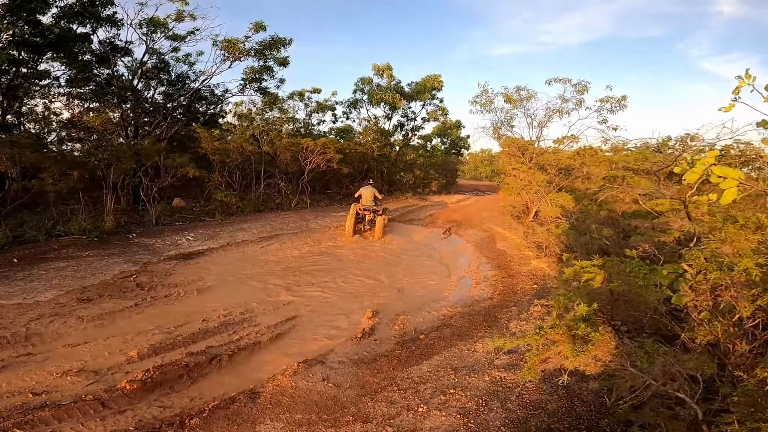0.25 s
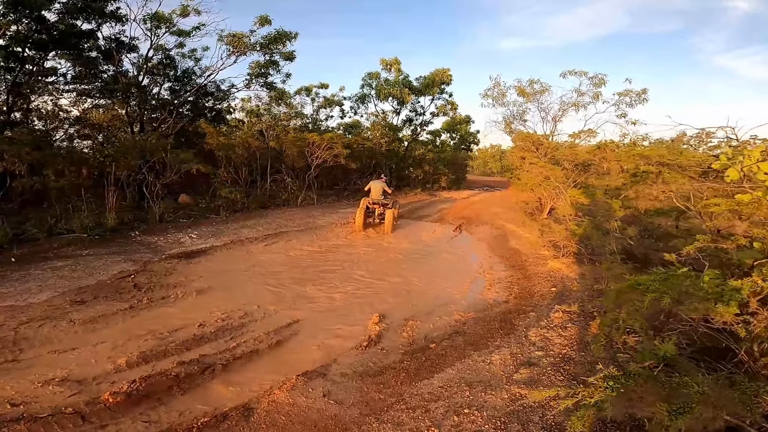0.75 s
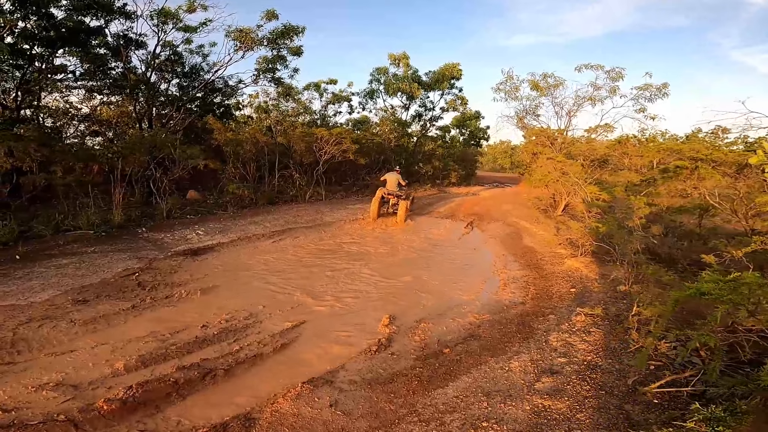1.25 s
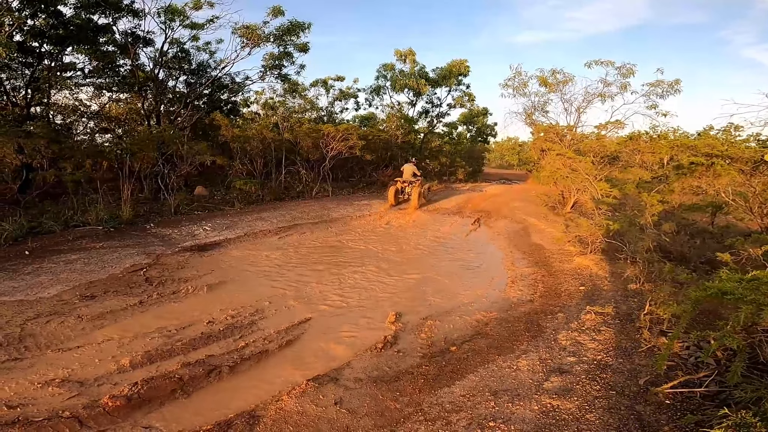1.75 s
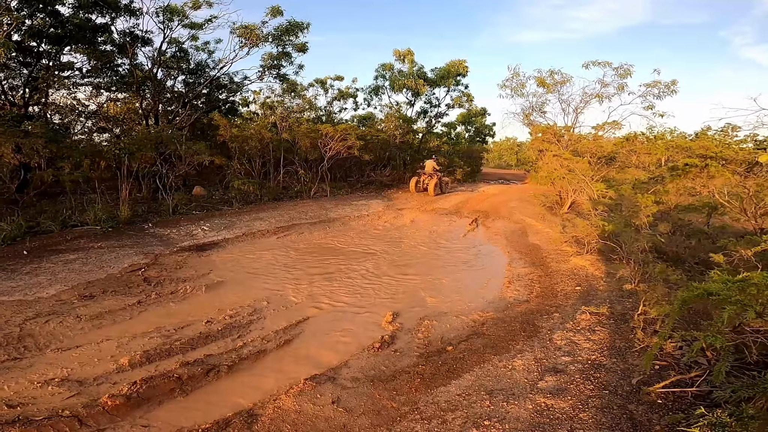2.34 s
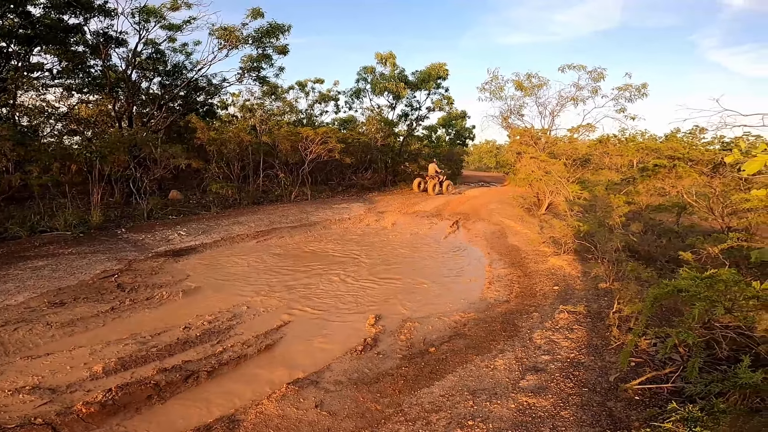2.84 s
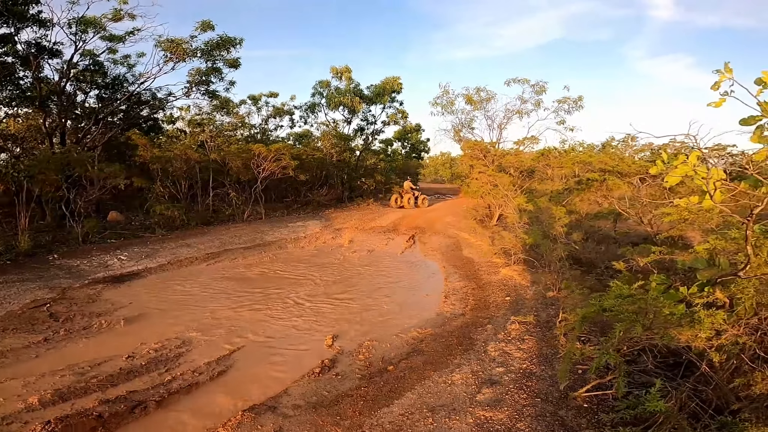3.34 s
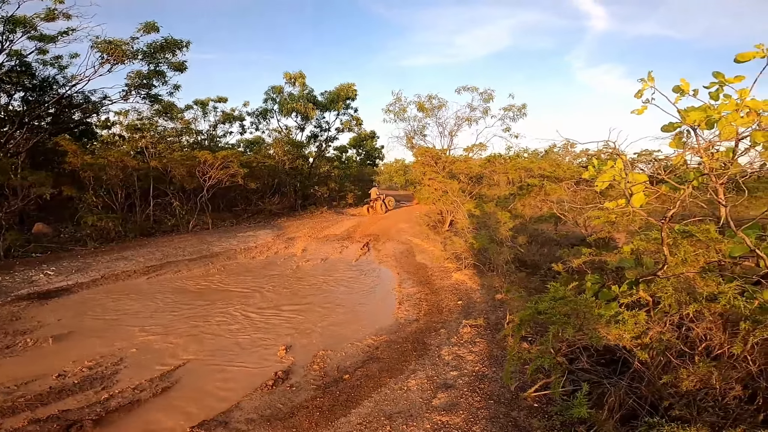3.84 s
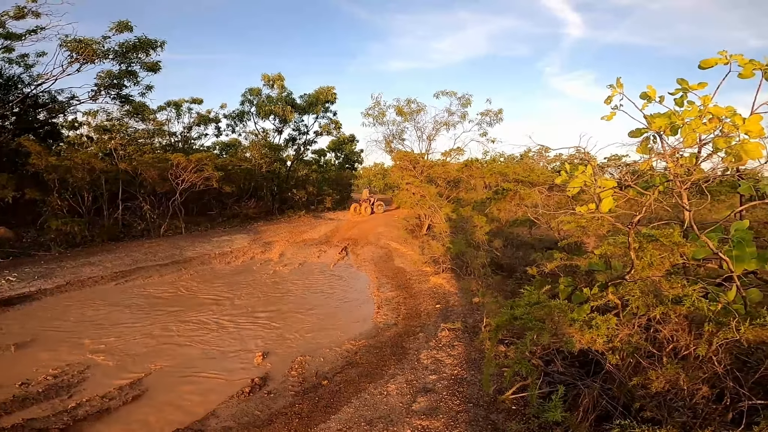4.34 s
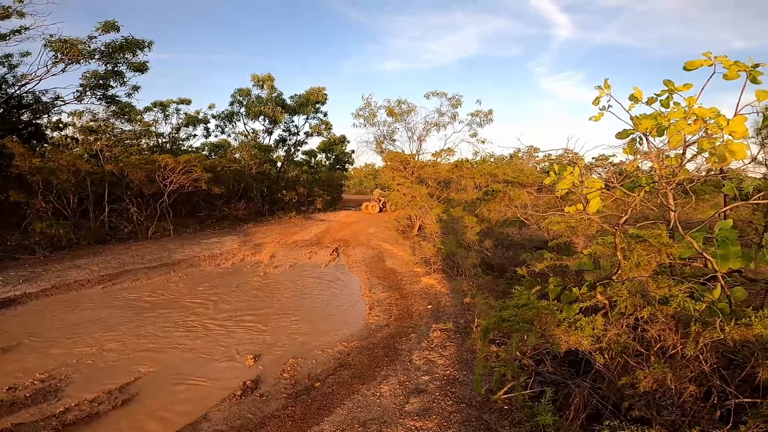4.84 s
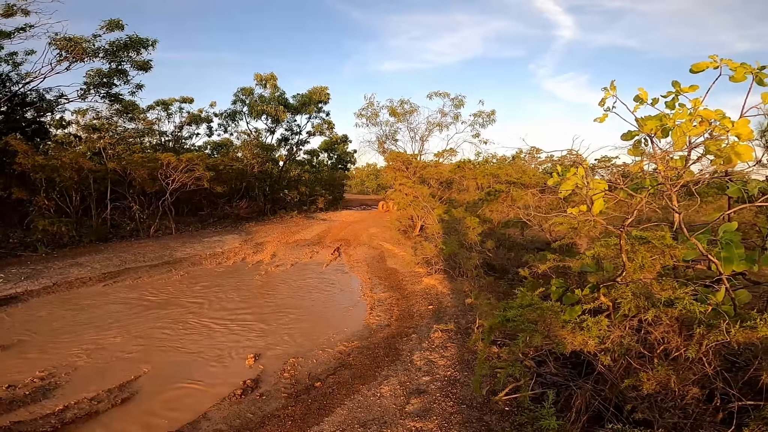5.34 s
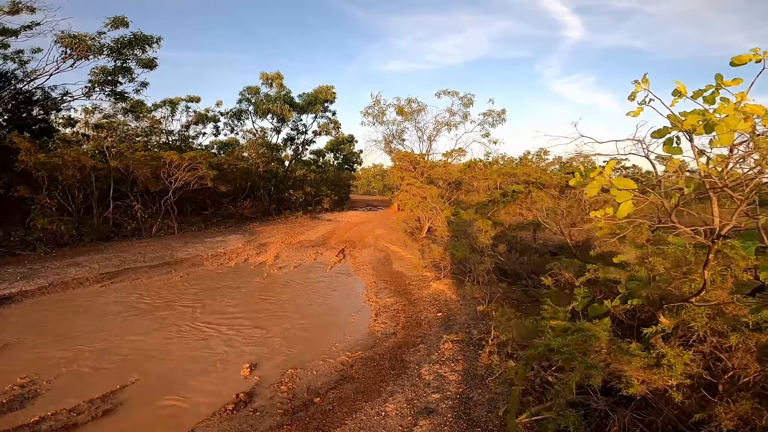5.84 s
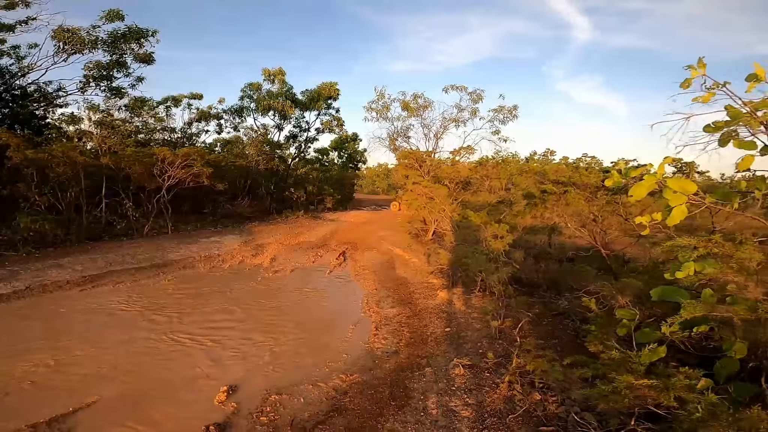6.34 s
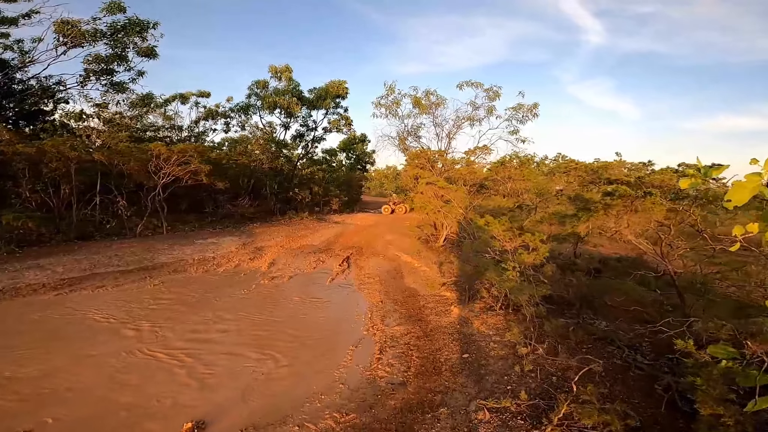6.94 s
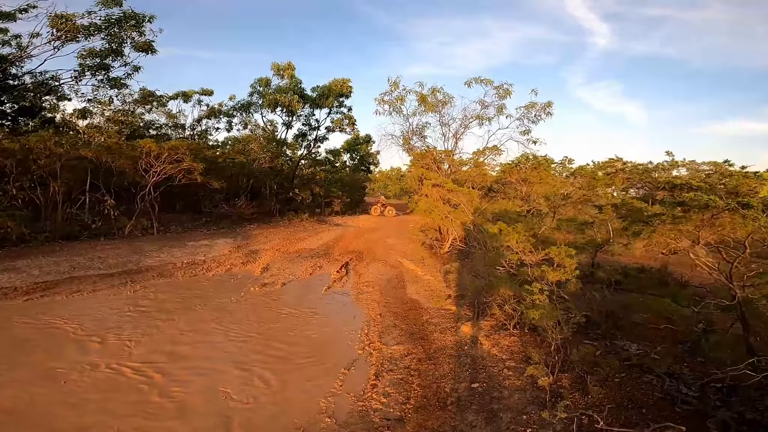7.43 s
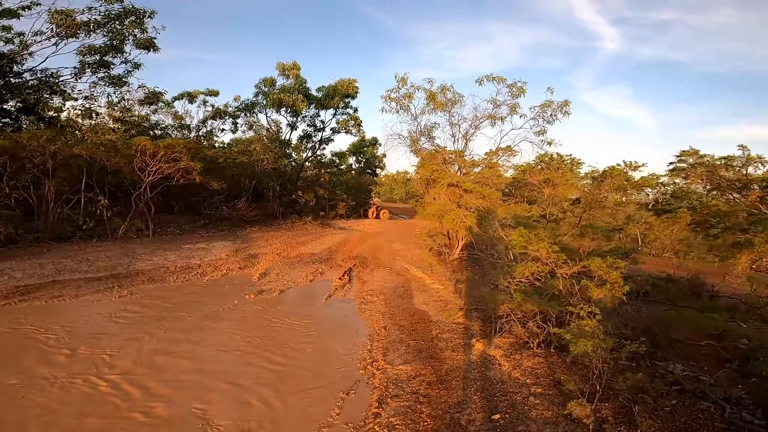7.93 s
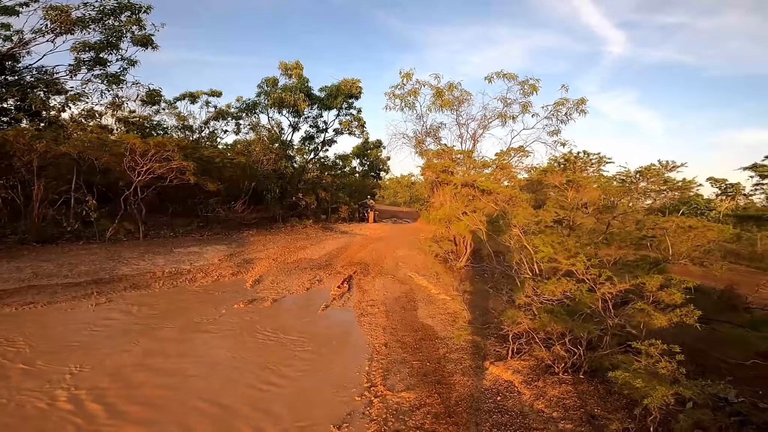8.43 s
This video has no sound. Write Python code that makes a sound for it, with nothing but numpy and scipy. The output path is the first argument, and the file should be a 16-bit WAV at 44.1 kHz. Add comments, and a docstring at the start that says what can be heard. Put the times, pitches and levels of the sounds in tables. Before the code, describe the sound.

A small single-cylinder quad bike drones steadily through muddy water, drops and stumbles, then revs in short bursts along dirt, with one loud backfire pop.

```python
"""A small single-cylinder quad bike pulls steadily through a mud hole, then is blipped along a dirt track.
Each firing is a thump of the silencer, with a sharp crack and hiss of gas when the throttle is open.
With the throttle shut the engine runs down and stumbles, and once it backfires: a loud pop.
Tyres throw water and grit (shaped noise with single grains), and short noise blows are the knocks.
The silencer's shell rings on, the bush scatters a faint echo, and a little wind buffets the microphone."""
import sys
import numpy as np
from scipy import signal
from scipy.fft import rfft, irfft, next_fast_len
from scipy.io import wavfile
from scipy.ndimage import uniform_filter1d

SR = 44100
rng = np.random.default_rng(int(sys.argv[2]) if len(sys.argv) > 2 else 0)


def wav_out(sig):
    """Save sig, one row per channel (or a flat mono array), as 16-bit PCM at SR to the path in sys.argv[1]."""
    wavfile.write(sys.argv[1], SR, np.round(np.clip(np.atleast_2d(sig).T, -1, 1) * 32767).astype(np.int16))


N = 382788

SIZE = 4096  # samples in one short sound
HZ, AGE, TIME = np.fft.rfftfreq(SIZE, 1 / SR), np.arange(SIZE) / SR, np.arange(N) / SR
LEAD_MS = 4  # room kept ahead of a firing, in which the pressure starts to swell
# the charge grows from nothing to full between these two aims (firings per s)
LEAN_HZ, FULL_HZ = 17.9, 30.2

# exhaust pulse with the throttle open: f/Hz, relative level/dB
OPEN_PULSE = [(15, -87), (30, -23.5), (55, -10), (80, -10.5), (120, -0.5), (165, 2), (245, -6.5),
              (325, -11), (420, -7.5), (530, -15.5), (625, -31.5), (780, -22), (1050, -43), (9000, -94)]
# pulls on the throttle: opens/s, shuts/s, speed aimed at/(firings per s),
# climb of that aim/(firings per s, each s), speed it falls back towards/(firings per s)
THROTTLE_PULLS = [(0.077, 2.233, 31.397, -0.195, 18.179), (3.465, 3.719, 32.85, 0, 11.446),
                  (4.019, 4.623, 31.34, 4.543, 12.807), (5.475, 6.164, 30.068, 13.085, 16.891),
                  (6.943, 7.109, 30.765, 0, 13.523), (7.406, 7.58, 26.91, 0, 11.378),
                  (7.785, 8.219, 21.661, 23.171, 24.56), (8.355, 8.7, 33.26, 0, 20)]


def amp(db):
    """Turns decibels into a gain."""
    return 10 ** (np.asarray(db) / 20)


def evened(x):
    """Scales a sound to rms 1."""
    return x / np.sqrt(np.mean(x ** 2) + 1e-20)


def unit(x):
    """Scales each row to energy 1."""
    return x / np.linalg.norm(x, axis=-1, keepdims=True)


def follow(table, s):
    """Reads each column of a table at the times s, with straight lines between its rows."""
    at, *columns = np.transpose(table)
    return [np.interp(s, at, column) for column in columns]


def shape(points, hz):
    """Reads a spectrum in dB, joined up on a log-frequency axis."""
    f, db = np.transpose(points)
    return np.interp(np.log(hz + 1), np.log(f + 1), db)


def causal(db):
    """Gives the response of a body that rings only after it is struck, from its gain in dB."""
    cepstrum = irfft(np.log(amp(db)))
    # fold the half before the blow onto the half after it
    cepstrum[..., 1:SIZE // 2] *= 2
    cepstrum[..., SIZE // 2 + 1:] = 0
    return np.exp(rfft(cepstrum))


def delayed(ms):
    """Gives the spectrum of a delay."""
    return np.exp(-2j * np.pi * HZ * ms / 10 ** 3)


def coloured(x, points):
    """Gives a long sound a spectrum, at rms 1."""
    size = next_fast_len(N)
    gain = amp(shape(points, np.fft.rfftfreq(size, 1 / SR)))
    return evened(irfft(rfft(x, size) * gain, size)[..., :N])


def pair(x, apart):
    """Makes two unrelated sounds into a left and a right that differ by the share apart."""
    return np.array([x[0] + apart * x[1], x[0] - apart * x[1]])


def add(mix, s, sound):
    """Adds a sound to the mix at time s, cut off at the end of the mix."""
    start = max(round(s * SR), 0)
    part = mix[:, start:][:, :sound.shape[-1]]
    part += sound[..., :part.shape[1]]


def crank(start_hz=16.523, spin_up_s=.093, run_down_s=.24, drag_s=.129):
    """The heavy crank lags behind the speed the throttle asks for, and the ground drags on it."""
    # mud and ruts drag on the wheels, or let go (minus): t/s, speed lost/(firings per s)
    drag_table = [(1.084, .947), (2.138, -.896), (4.415, 1.877), (5.849, 2.184)]
    speed = np.full(N, start_hz)
    for opens, shuts, aim_hz, climb, rest_hz in THROTTLE_PULLS:
        changes = (opens, aim_hz, climb, spin_up_s), (shuts, rest_hz, 0, run_down_s)
        for s, hz, slope, lag_s in changes:
            age = np.maximum(TIME - s, 0)
            gap = np.interp(s, TIME, speed) - hz
            changed = hz + slope * age + gap * np.exp(-age / lag_s)
            speed = np.where(TIME > s, changed, speed)
    return speed - sum(lost * np.exp(-((TIME - s) / drag_s) ** 2) for s, lost in drag_table)


def charge(s, fill_lag_s=0.0013, fill_s=0.023, empty_lag_s=0.036, empty_s=0.03):
    """The cylinder's filling (0-1) follows the throttle softly; the load of the pull in force comes along."""
    # load in each pull: opening (0-1), relative thump/dB, relative crack/dB,
    # then relative thump/dB and crack/dB of the coast that follows
    load_table = [(0.81, -16.5, -31.5, -22, -54), (0.89, -16.5, -39, -22, -54.5),
                  (0.95, -16.5, -36.5, -25, -59), (0.97, -16.5, -36.5, -25, -63.5),
                  (0.73, -17.5, -42.5, -24.5, -64), (0.78, -19.5, -71, -26, -62),
                  (0.91, -19, -38.5, -21, -74), (0.93, -18.5, -43, -45, -62)]
    full, load = np.zeros(len(s)), np.array(load_table[0])[:, None]
    for (opens, shuts, aim_hz, climb, rest_hz), levels in zip(THROTTLE_PULLS, load_table):
        rise = .5 + .5 * np.tanh((s - opens - fill_lag_s) / (2 * fill_s))
        fall = .5 + .5 * np.tanh((s - shuts - empty_lag_s) / (2 * empty_s))
        pulling = np.interp(aim_hz + climb * (s - opens), [LEAN_HZ, FULL_HZ], [0, 1])
        coasting = np.interp(rest_hz, [LEAN_HZ, FULL_HZ], [0, 1])
        full += rise * (pulling - full)
        full += fall * (coasting - full)
        load = load + rise * (np.array(levels)[:, None] - load)
    return full, *load


def stumble(s, stumble_s=0.032):
    """A poor charge burns as a weaker and higher putt: the dB lost and the opening gained at times s."""
    # stumbles: t/s, level lost/dB, opening gained (0-1)
    stumble_table = [(.03, 2, 0), (2.81, 2, 0.35), (2.97, 2.5, 0.39), (3.14, 4.5, 0.48), (3.3, 2.5, 0.42),
                     (3.41, 4.5, 0.23), (3.78, 3.5, 0.38), (3.96, 7.5, 0.55), (5, 8, 0.1), (5.13, 6.5, 0),
                     (6.6, 3, 0.15), (6.72, 8, .45), (6.88, 4, 0.33), (7.18, 3, 0.28), (7.32, 4.5, 0.37)]
    return sum(np.outer(change, np.exp(-((s - at) / stumble_s) ** 2)) for at, *change in stumble_table)


def effort(s, speed, thump_curve=0.96, crack_curve=1.76,
           coast_hz=21, thump_db_per_hz=.65, crack_db_per_hz=.5):
    """A fuller charge moves each firing's opening, thump and crack from coasting towards pulling."""
    full, opening, thump_db, crack_db, coast_db, coast_crack_db = charge(s)
    lost_db, gained = stumble(s)
    # a coasting engine is louder when it turns faster
    coast_thump = coast_db + thump_db_per_hz * (np.minimum(speed, FULL_HZ) - coast_hz)
    coast_crack = coast_crack_db + crack_db_per_hz * (speed - coast_hz)
    throttle = np.clip(opening * full + gained, 0, 1.15)
    thump = coast_thump + (thump_db - coast_thump) * full ** thump_curve - lost_db
    crack = coast_crack + (crack_db - coast_crack) * full ** crack_curve - lost_db
    return throttle, thump, crack


def thumps(throttle, speed, lost_db, late_per_db=0.12, late_ms=13.5, uneven_db=-0.7,
           slow_ms=2.0, valve_hz=170, valve_db=24, rise_ms=0.96):
    """The silencer rings higher and harder as the throttle opens; near idle a poor charge burns late."""
    # exhaust pulse with the throttle shut, then half open: f/Hz, relative level/dB
    shut_pulse = [(15, -49), (30, -27.5), (52, -9.5), (80, 0), (115, 7.5), (150, -5), (200, -5),
                  (245, -13.5), (310, -39.5), (440, -28), (620, -41), (1500, -72.5), (9000, -75.5)]
    half_pulse = [(15, -48), (30, -27), (55, -17.5), (78, -15.5), (105, 0), (138, 4.5), (180, -4),
                  (220, -10.5), (265, -6), (335, -17), (435, -18), (600, -45.5), (1500, -60.5),
                  (9000, -99.5)]
    chance = rng.standard_normal((len(speed), 3, 1))
    shut = np.clip(1 - throttle, 0, 1)
    low, high = np.clip(1 - 2 * throttle, 0, 1), np.clip(2 * throttle - 1, 0, 1.2)
    colour = low * shape(shut_pulse, HZ) + (1 - low - high) * shape(half_pulse, HZ)
    colour = colour + high * shape(OPEN_PULSE, HZ)
    # the valve opens gradually, which rounds the front of the pulse, most of all at low pressure;
    # taking the rounding off again keeps the levels of colour and changes only the timing
    rounding = valve_db * np.tanh((HZ / (valve_hz * (2 + 2 * throttle))) ** 2)
    ring = causal(colour + rounding) * amp(-rounding) * delayed(rise_ms + slow_ms * shut)
    # a share of the pulse comes late
    starved = shut * np.clip((25 - speed) / 5, 0, 1)
    late = np.clip(late_per_db * lost_db + 0.23 * starved * chance[:, 0], 0, .7)
    ring = ring * (1 - late + late * delayed(late_ms + 1.54 * chance[:, 1]))
    pulses = unit(irfft(ring * delayed(LEAD_MS - 3.6 * shut)))
    return pulses * amp((uneven_db * starved - 0.46) * chance[:, 2])


def cracks(s, throttle, at_ms=.2, burst_ms=1.0, tail_db=-16, tail_ms=9.0, shock=1.75, apart=0.027,
           uneven_db=1.0, shut_tail_db=24, rasp_hz=2910, rasp_width_hz=850):
    """A shock and a burst of turbulence ring the pipe at each firing, then echo off the ground."""
    # crack of gas at the pipe mouth: f/Hz, relative level/dB
    crack_curve = [(150, -39.5), (550, -1.5), (900, 2.5), (1100, 0.5), (1500, 3.5), (2200, -1.5), (3200, 0),
                   (4300, -12), (6500, -17.5), (9000, -27), (13000, -31.5), (16000, -42)]
    # where the pipe is: t/s, delay of the ground echo/ms, strength of the echo, lag at the left ear/ms
    place_table = [(0, 0.57, 0.72, 0.036), (1.1, 0.65, 0.37, 0.059), (2.2, 0.78, 0.49, 0.031),
                   (3.6, 0.66, 0.17, 0.058), (4.4, 0.655, 0.044, 0.0017), (8.68, 0.4, 0.042, .012)]
    # tailpipe's ring: t/s, f/Hz, height/dB, height of its broad upper rasp/dB
    pipe_table = [(0, 760, 1, -3), (1.1, 1000, -4, 0), (1.7, 920, 8.5, -1.5), (2.3, 920, 11.5, -3.5),
                  (3.5, 760, -18, 2), (4.4, 797, 2, 3), (6, 890, 6.5, 6), (8.68, 720, 12, 1.5)]
    echo_ms, echo, lag_ms = (c[:, None] for c in follow(place_table, s))
    pipe_hz, pipe_db, rasp_db = (c[:, None] for c in follow(pipe_table, s))
    ms = AGE * 10 ** 3 - LEAD_MS - at_ms
    burst = np.exp(-(ms / burst_ms) ** 2)
    tail = amp(tail_db + shut_tail_db * np.clip(1 - throttle, 0, 1)) * np.exp(-abs(ms) / tail_ms) * (ms > -1)
    gas = pair(rng.standard_normal((2, len(s), SIZE)), apart) * (burst + tail)
    ring_db = pipe_db / (1 + ((HZ - pipe_hz) / 60) ** 2)
    upper_db = rasp_db * np.exp(-((HZ - rasp_hz) / rasp_width_hz) ** 2)
    body = causal(shape(crack_curve, HZ) + ring_db + upper_db)
    spectrum = (rfft(gas) + shock * delayed(LEAD_MS + at_ms)) * body * (1 + echo * delayed(echo_ms))
    spectrum[0] *= delayed(lag_ms)
    return unit(irfft(spectrum)) * amp(uneven_db * rng.standard_normal((len(s), 1)))


def jets(count, decay_s=0.0036, apart=0.17):
    """The jet of gas hisses on after each crack, as the pressure in the pipe runs down."""
    # hiss of the jet: f/Hz, relative level/dB
    jet_curve = [(1000, -42), (3000, 9.5), (4500, 2.5), (6600, -2), (7800, -9.5), (8800, -8), (12500, -16),
                 (16000, -38)]
    gas = pair(rng.standard_normal((2, count, SIZE)), apart) * np.exp(-AGE / decay_s)
    return unit(irfft(rfft(gas) * causal(shape(jet_curve, HZ)) * delayed(LEAD_MS)))


def engine(thump_db=0.04, crack_db=-0.07, jet_db=-15):
    """Each full cycle of the crank fires once, giving a thump, a crack and a hiss."""
    speed = crank()
    at = np.flatnonzero(np.diff(np.floor(.5 + np.cumsum(speed) / SR)))
    s, speed = at / SR, speed[at, None]
    throttle, thump_level, crack_level = (c[:, None] for c in effort(s, speed[:, 0]))
    lost_db = stumble(s)[0, :, None]
    pulses = amp(thump_level + thump_db) * thumps(throttle, speed, lost_db)
    gas = cracks(s, throttle) + amp(jet_db) * jets(len(s))
    pulses = pulses + amp(crack_level + crack_db) * gas
    pulses *= np.sqrt(SR / speed)  # each pulse holds the energy of a whole cycle
    out = np.zeros((2, N))
    for k, start in enumerate(s):
        add(out, start - LEAD_MS / 10 ** 3, pulses[:, k])
    return out


def shell(x, ring_db=-10, t60=0.11, onset_s=0.0034):
    """Each pulse shakes the many close tones of the silencer's shell and frame, the same every time."""
    # shell and frame ringing on: f/Hz, relative level/dB
    shell_curve = [(120, -16.5), (260, -3.5), (380, -4), (520, -4.5), (680, 0.5), (900, -3), (1400, -10),
                   (4000, -23.5)]
    fade = amp(-60 * AGE / t60) * (1 - np.exp(-AGE / onset_s))
    taps = pair(rng.standard_normal((2, SIZE)), 0.13) * fade
    ring = irfft(rfft(unit(taps)) * causal(shape(shell_curve, HZ)))
    return amp(ring_db) * signal.fftconvolve(x, ring, axes=1)[:, :N]


def trees(x, wet_db=-25, t60=0.052):
    """The bush beside the track scatters a faint echo: many scattered, fading copies."""
    t = TIME[:SR // 2]
    hits = rng.standard_normal((2, len(t))) * (rng.random((2, len(t))) < 2000 / SR)
    taps = hits * (t > .012) * amp(-60 * t / t60)
    return amp(wet_db) * signal.fftconvolve(x, unit(taps), axes=1)[:, :N]


def patter(per_s, spread_db, grain_db, flicker_db=2.5):
    """Countless tiny impacts blur into a wash, with single drops and grains standing out, left and right."""
    sizes = amp(spread_db * np.minimum(rng.exponential(1, (2, N)), 4.5))
    grains = sizes * (rng.random((2, N)) < per_s / SR) * rng.choice([-1, 1], (2, N))
    flicker = evened(uniform_filter1d(rng.standard_normal(N), size=900))
    wash = rng.standard_normal((2, N))
    return (wash + amp(grain_db) * evened(grains)) * amp(flicker_db * flicker)


def wheels(rumble_db=5.0, spray_db=-2, fizz_db=-3,
           driven_rumble_db=5.0, driven_spray_db=10.5, driven_fizz_db=14):
    """Tyres rumble over ruts and fling water, mud and grit, the more so when the engine drives them."""
    # ground under the coasting wheels: t/s, then relative level/dB of ruts, loose mud and fine fizz
    ground_table = [(0, -59, -55, -65), (1.7, -45.5, -53.5, -67), (2.5, -55, -52.5, -64),
                    (3.35, -52, -52, -60.5), (3.9, -36.5, -50, -59.5), (4.6, -42.5, -52.5, -65),
                    (5.05, -59.5, -62.5, -71), (5.8, -44, -53, -67.5), (6.15, -56, -54, -72.5),
                    (6.4, -54, -58.5, -76), (6.9, -58.5, -69.5, -67.5), (7.2, -58, -55.5, -67),
                    (7.35, -53.5, -65, -75.5), (7.8, -51, -52, -64.5), (8.4, -38, -53, -60.5),
                    (8.68, -45.5, -50, -63)]
    # colours of the rumble, the spray and the fizz: f/Hz, relative level/dB
    rumble_curve = [(30, -21), (90, -10.5), (180, 10), (300, 7.5), (440, 5), (610, -6.5), (900, -14.5),
                    (1400, -21), (4000, -54)]
    spray_curve = [(300, -22), (800, 1.5), (1600, 0.5), (2200, 0.5), (3200, -0.5), (4400, -6), (7000, -17),
                   (14000, -74.5)]
    fizz_curve = [(2000, -39.5), (4500, 4), (6500, 3), (8000, -3), (9000, -2), (12500, -7.5), (15000, -17),
                  (16500, -37.5)]
    ruts, mud, grit = follow(ground_table, TIME)
    steps = np.linspace(0, N / SR, 1000)
    drive = np.interp(TIME, steps, charge(steps)[0])
    rumble = ruts + driven_rumble_db * drive + rumble_db
    spray = mud + driven_spray_db * drive + spray_db
    fizz = grit + driven_fizz_db * drive + fizz_db
    out = amp(rumble) * coloured(pair(patter(150, 1.0, -17), 0.12), rumble_curve)
    out += amp(spray) * coloured(pair(patter(700, 8.8, -17.5), 0.19), spray_curve)
    sides = amp([[-2.2], [1.8]])  # the fizz is stronger on the right
    return out + amp(fizz) * coloured(pair(patter(1100, 5.1, 1), 0.7), fizz_curve) * sides


def bush(bush_db=-59.0):
    """The scrub makes a faint steady sizzle: quiet shaped noise."""
    # sizzle of the bush: f/Hz, relative level/dB
    bush_curve = [(200, 2.5), (1200, 3), (2100, -6.5), (2900, -7), (3600, -4), (4400, -13.5), (9000, -19.5),
                  (16000, -41.5)]
    return amp(bush_db) * coloured(pair(rng.standard_normal((2, N)), 0.17), bush_curve)


def wind(wind_db=-2):
    """Moving air buffets the microphone as low noise, partly different at each ear."""
    # gusts: t/s, relative level/dB
    gust_table = [(0, -51), (2.3, -63), (3.2, -32.5), (3.9, -32), (5, -39), (5.6, -61), (7.5, -47),
                  (7.85, -30.5), (8.68, -35)]
    # colour of the buffeting: f/Hz, relative level/dB
    wind_curve = [(5, -20), (20, -7.5), (38, -1.5), (60, 3), (110, -21.5), (300, -45.5), (1000, -80.5)]
    gust, = follow(gust_table, TIME)
    return amp(gust + wind_db) * coloured(pair(rng.standard_normal((2, N)), 0.29), wind_curve)


def knocks(knock_db=-7, length_s=0.0068, decay_s=0.003, tail_db=-18, tail_s=0.021):
    """Stones and the frame knock: short dry blows, each ringing in one broad band."""
    # knocks: t/s, relative level/dB, low edge f/Hz, high edge f/Hz
    knock_table = [(3.109, -31, 800, 5060), (3.292, -46, 2000, 6940), (3.924, -27, 300, 900),
                   (3.939, -25, 250, 790), (5.363, -43, 800, 1390), (6.714, -44, 700, 4000),
                   (7.170, -36, 1190, 3300), (7.183, -36, 1000, 2770), (7.205, -43, 1300, 3503),
                   (7.23, -41, 900, 2480), (7.247, -35, 800, 1660), (7.396, -26.5, 500, 2440),
                   (7.883, -40, 600, 2502), (8.333, -33, 900, 3000)]
    out = np.zeros((2, N))
    fade = np.exp(-AGE / decay_s) + amp(tail_db) * np.exp(-AGE / tail_s)
    for s, db, low_hz, high_hz in knock_table:
        blow = pair(rng.standard_normal((2, SIZE)), 0.15) * fade
        band_db = -10 * np.log10(1 + (low_hz / (HZ + 20)) ** 4 + (HZ / high_hz) ** 8)
        ring = irfft(rfft(blow) * causal(band_db))
        add(out, s, amp(db + knock_db) * unit(ring) * np.sqrt(SR * length_s))
    return out


def backfire(crack_db=3, crack_s=0.00091, tail_db=-33, tail_s=0.11):
    """Unburnt fuel pops once in the silencer: a boom, and a crack that dies away among the trees."""
    # the pop: t/s, level of the boom's peak/dB
    pop_moment = (6.5785, -5.5)
    # the pop's crack: f/Hz, relative level/dB
    pop_curve = [(200, 2), (900, -6), (1550, 2.5), (2900, -15), (3800, -11.5), (4700, -33), (7000, -35),
                 (16000, -64)]
    s, db = pop_moment
    age, out = TIME[:SR // 2], np.zeros((2, N))
    boom = irfft(causal(shape(OPEN_PULSE, HZ)))
    fade = np.exp(-age / crack_s) + amp(tail_db) * np.exp(-age / tail_s)
    gas = pair(rng.standard_normal((2, len(age))), 0.05) * fade
    crack = signal.fftconvolve(gas, irfft(causal(shape(pop_curve, HZ)))[None])
    add(out, s, amp(crack_db) * unit(crack))
    add(out, s, boom / abs(boom).max())
    return amp(db) * out


def scene():
    """Sums the exhaust, its ringing shell and echo, the wheels, the knocks, the scrub and the wind."""
    exhaust = engine() + backfire()
    return exhaust + shell(exhaust) + trees(exhaust) + wheels() + knocks() + bush() + wind()


def record(dry, edge_hz=15700):
    """Cuts away the treble above the edge with a steep filter."""
    low_pass = signal.firwin(511, edge_hz, window=("kaiser", 9), fs=SR)
    return signal.oaconvolve(dry, low_pass[None], "same")


dry = scene()
out = record(dry)
wav_out(out)
```